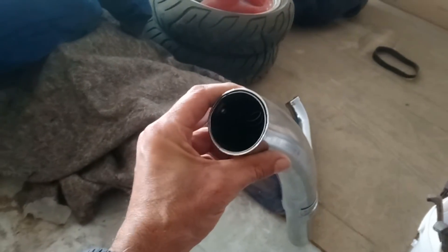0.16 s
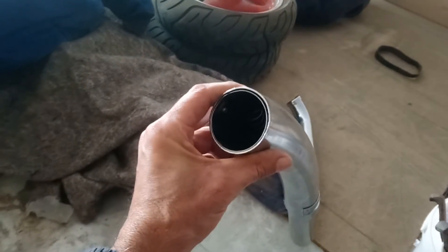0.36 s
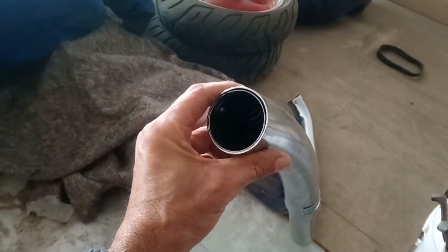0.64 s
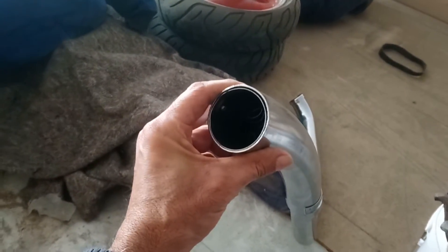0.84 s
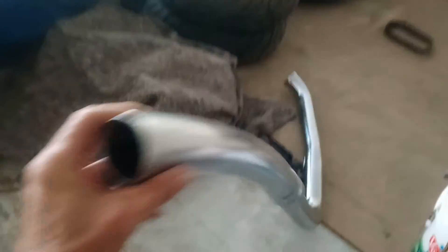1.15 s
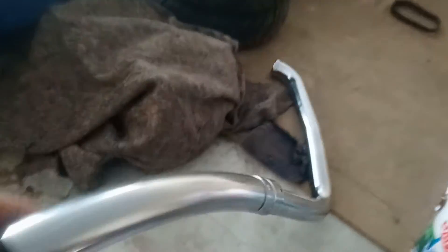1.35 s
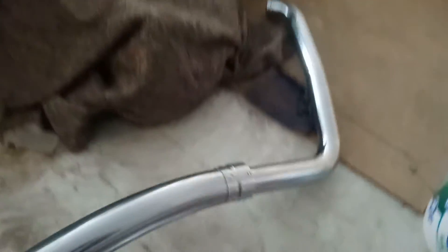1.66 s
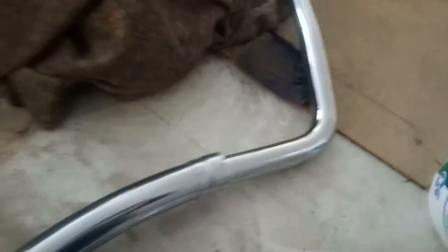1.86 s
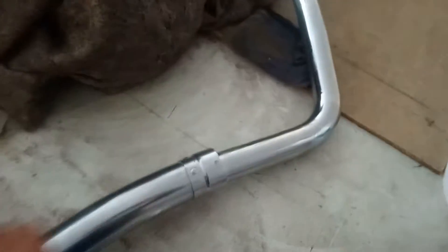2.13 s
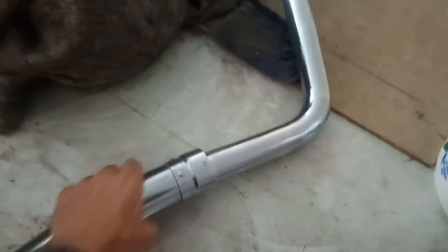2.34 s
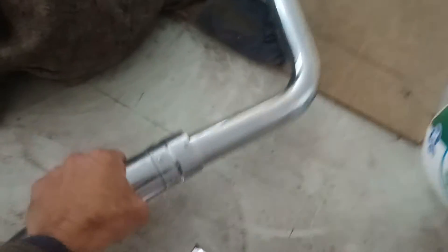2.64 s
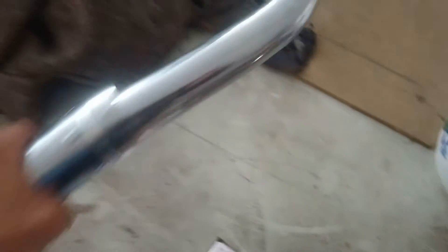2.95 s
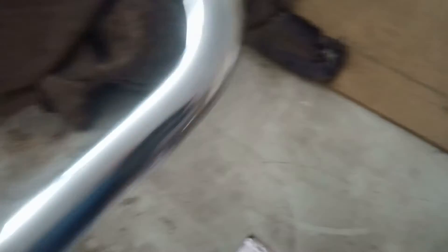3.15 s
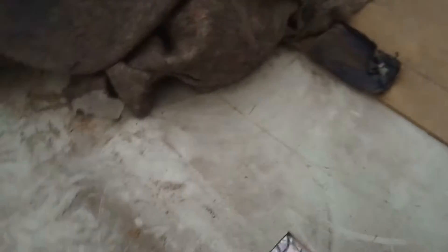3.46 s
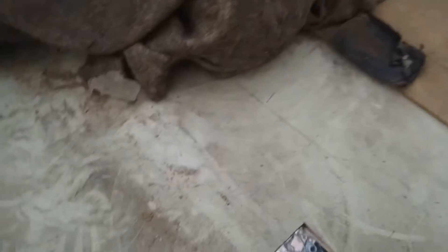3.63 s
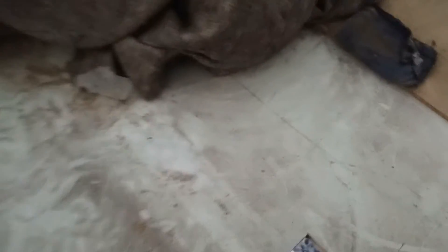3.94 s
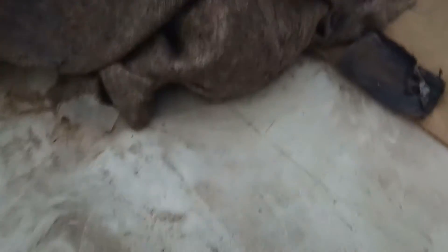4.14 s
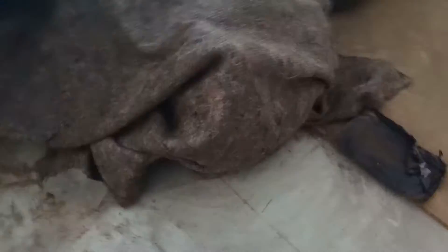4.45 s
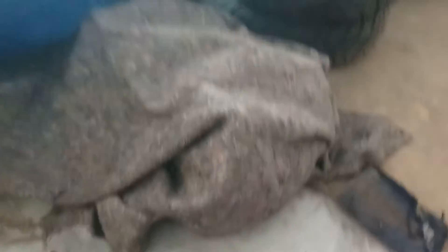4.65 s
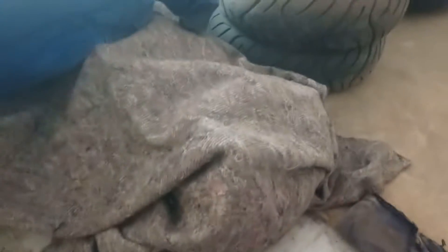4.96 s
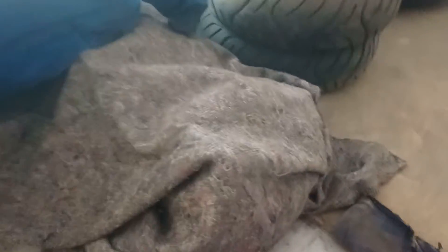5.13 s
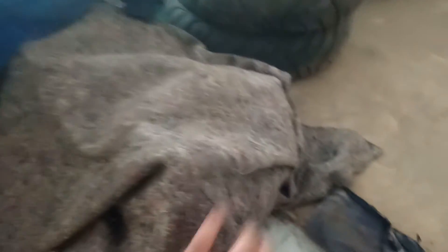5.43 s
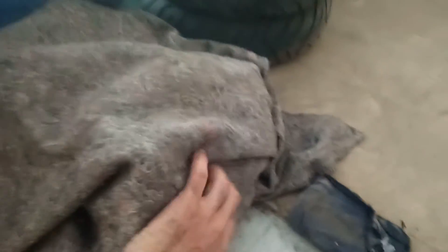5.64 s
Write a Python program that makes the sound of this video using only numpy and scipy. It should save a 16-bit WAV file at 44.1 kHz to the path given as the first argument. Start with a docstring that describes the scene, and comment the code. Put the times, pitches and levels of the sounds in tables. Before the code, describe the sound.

A steel pipe bumps and clanks onto a concrete floor, is picked up, then clatters away in a ringing metallic tumble beside faint cloth rustle.

```python
"""A steel exhaust pipe is lowered onto a workshop floor: it bumps twice, lands with a heavy clank and is picked up.
Then it is tossed aside and tumbles over the concrete, ringing at every bounce. Each blow is a swing of the floor,
bursts of coloured noise for heave, thud, clank and clash, and a set of fading sine waves for the ringing steel.
Clothes and a blanket rustle close by, and a dragged edge squeaks: noise and wavering tones that swell and fade.
The small room booms briefly in the tail of each blow, over steady quiet noise."""
import sys
import numpy as np
from scipy import signal
from scipy.fft import rfft, irfft, next_fast_len
from scipy.io import wavfile
from scipy.ndimage import uniform_filter1d, minimum_filter1d, map_coordinates

SR = 44100
rng = np.random.default_rng(int(sys.argv[2]) if len(sys.argv) > 2 else 0)


def master_out(mix):
    """Clip the mix to full scale and print it as 16-bit PCM to the path in sys.argv[1]."""
    frames = np.transpose(np.atleast_2d(mix))
    ceiling = np.clip(frames, -1, 1)
    pcm = np.round(ceiling * 32767).astype(np.int16)
    wavfile.write(sys.argv[1], SR, pcm)


N = 255339  # length in samples

# The pipe meets the floor. Each row: start in seconds, first swing of the floor in relative dB, its rough
# pitch in Hz, then floor heave, tube thud, tube clank and bare steel clash in relative dB, then the two modes
# that the contact point changes: lower in Hz, its change in dB, upper in Hz, its change in dB.
FLOOR_BLOWS = [(1.171, -9.5, 250, -31, -27.5, -60, -77, 460, 4, 1810, 22.5),
               (1.357, -16.5, 246, -33.5, -35, -72, -101, 244, -1, 460, -2),
               (1.826, -12, 150, -29, -19.5, -26.5, -36, 244, -5.5, 1520, 10.5),
               (1.832, 7, 180, -25, -13, -47, -53, 178, -3.5, 2078, 7),
               (1.861, -7.5, 258, -33.5, -20.5, -29.5, -39, 460, 2.5, 2143, 9.5),
               (3.883, -17, 260, -48, -26.5, -18.5, -16.5, 848, 13, 5899, 6.5),
               (3.914, -20, 228, -53, -30, -26, -24.5, 4100, 11, 6301, 15.5),
               (3.982, -8.5, 226, -38, -23.5, -23.5, -16.5, 3682, 12, 5972, 11),
               (4.156, 1.5, 335, -37, -20.5, -21, -30.5, 694, 10, 2235, -2),
               (4.168, -6.5, 257, -45, -22, -27.5, -36, 1325, 11, 2143, 5),
               (4.207, -15, 227, -25, -21, -22, -18.5, 2337, 18.5, 4290, 9.5),
               (4.262, -34, 224, -52, -34, -33, -34, 2357, 23, 4200, 14),
               (4.338, -1, 190, -19.5, -17, -22.5, -22, 1325, -1, 4345, -2),
               (4.374, -26, 224, -27.5, -34, -27.5, -27.5, 1325, 11, 4345, 15),
               (4.392, -23, 242, -30, -20.5, -29.5, -27.5, 2078, 20.5, 5726, 6),
               (4.567, -15, 242, -49, -26.5, -33.5, -37, 1520, 1, 4290, 1),
               (4.586, -16, 280, -49, -25.5, -33.5, -40, 2143, 18.5, 4290, 10),
               (4.608, -20, 226, -28.5, -20.5, -27, -21, 3951, 13.5, 4290, 15),
               (4.647, -1, 169, -24.5, -19, -36.5, -45.5, 178, 3, 2143, 20),
               (4.679, -13, 170, -28.5, -23.5, -36, -47.5, 178, 10, 2143, 20),
               (4.704, -28, 224, -41, -26.5, -24, -23.5, 1325, 13, 5726, 12),
               (4.735, -16, 224, -52, -34.5, -37, -38, 1810, 33, 2078, 0),
               (4.791, -30, 280, -62, -49, -32.5, -27.5, 1640, 9, 5726, 7.5),
               (4.799, -3.5, 287, -58, -31, -35, -40, 244, 7, 1640, 32),
               (4.823, -21, 275, -61, -31, -29, -26, 2283, 28, 4870, 19)]
# Ringing modes of the tube: its air column below 700 Hz, its steel wall above.
# Each row: pitch in Hz, relative strength in dB, time to fade by 60 dB in seconds if left alone.
PIPE_MODES = [(178, 5, .4), (244, 5, .4), (460, -2, .33), (694, -8, .25), (848, -2, .3), (1325, -2, .35),
              (1520, -10, 1.7), (1640, -6, .3), (1810, -5, .3), (2040, -6, .3), (2078, -7, 1.9),
              (2143, -8, 1.5), (2235, -7, .4), (2283, -6, .25), (2321, -3, .6), (2357, -6, .4),
              (2470, -4, .3), (2540, -3, .3), (2655, -4, .35), (2820, -6, .3), (3295, -4, .3),
              (3682, -2, .22), (3828, -7, .3), (3951, -5, .25), (4100, -2, .3), (4250, -7, .25),
              (4290, -4, .3), (4312, -6, .22), (4345, -6, .25), (4522, -7, .25), (4786, -2, .25),
              (4870, -7, .25), (5280, -7, .25), (5726, -4, .3), (5899, -3, .28), (5972, -2, .27),
              (6020, -5, .22), (6301, -5, .28), (6600, -7, .25), (6700, -7, .25), (6870, -9, .25),
              (7135, -12, .3), (7550, -15, .3)]


def amp(db):
    """Turn decibels into a plain gain."""
    return 10 ** (np.asarray(db) / 20)


def unit(x):
    """Scale x to an rms (average strength) of 1."""
    return x / np.sqrt(np.mean(x ** 2) + 1e-20)


def along(points, hz):
    """Read a curve of (Hz, value) points, with frequency on a log axis."""
    f, v = np.transpose(points)
    return np.interp(np.log(hz + 1), np.log(f + 1), v)


def wobble(rate):
    """A smooth random curve through new random values, rate of them a second."""
    values = rng.standard_normal(int(N * rate / SR) + 4)
    return map_coordinates(values, [np.arange(N) * rate / SR])


def filtered(x, response):
    """Change the strength and phase of each frequency in x by a given response."""
    size = next_fast_len(x.shape[-1] + 8192)  # spare room keeps the end from wrapping to the start
    spectrum = rfft(x, size) * response(np.fft.rfftfreq(size, 1 / SR))
    return irfft(spectrum, size)[..., :x.shape[-1]]


def noise(spectrum, size, jagged=0, alike=None):
    """Coloured stereo noise of rms 1, more alike left and right in the bass; jagged adds chance resonances."""
    # Each row: frequency in Hz, likeness of left and right (1 is the same, 0 unrelated).
    usual_likeness = [(100, 0.78), (250, 0.74), (500, 0.69), (1000, 0.018), (2000, -0.042), (4000, 0.011),
                      (12000, -0.064)]
    hz = np.fft.rfftfreq(size, 1 / SR)
    likeness = along(usual_likeness if alike is None else alike, hz)
    turn = np.arccos(np.clip(likeness, -1, 1)) / 2  # shares the noise between middle and sides
    knots = np.arange(0, SR / 2, 45)  # one chance peak or dip every 45 Hz
    peaks_db = jagged * np.interp(hz, knots, rng.uniform(-2.7, 2.37, len(knots)))
    white = rfft(rng.standard_normal((2, size)))
    coloured = white * amp(along(spectrum, hz) + peaks_db)
    mid, side = irfft(coloured * [np.cos(turn), np.sin(turn)], size)
    return unit(np.array([mid + side, mid - side]))


def add(track, s, sound):
    """Mix a sound into the track from s seconds on."""
    part = track[:, round(s * SR):][:, :sound.shape[1]]
    part += sound[:, :part.shape[1]]


def gesture(start, end, rise, fall):
    """An envelope that swells up to start, holds until end and dies away."""
    t = np.arange(N) / SR
    before, after = np.maximum(start - t, 0), np.maximum(t - end, 0)
    return np.exp(-before / rise - after / fall)


def workshop_quiet():
    """The steady background: soft coloured noise whose level drifts slightly."""
    # Each row: frequency in Hz, relative strength in dB per Hz.
    quiet_colour = [(25, -22), (55, -8.5), (98, -1), (140, -7.5), (280, -8.5), (500, -14.5), (1000, -17),
                    (2000, -20), (3000, -22.5), (4800, -23), (6000, -6), (6900, -18), (8200, -35),
                    (13000, -40), (15300, -21), (16400, -49.5)]
    return amp(-64.5 + 0.16 * wobble(7.2)) * noise(quiet_colour, size=N)


def handling():
    """Hands and sleeves rub unevenly with every arm movement: two rustling noises over a low rumble."""
    # Arm movements: lower the pipe, reach, lift, toss, reach for the blanket.
    # Each row: start in seconds, end in seconds, rustle in relative dB, rumble in relative dB.
    moves = [(0.987, 1.823, -69.5, -60.5), (2.054, 2.496, -61, -62.5), (2.62, 3.204, -62, -76),
             (3.728, 3.9, -63.5, -62), (5.143, 5.505, -54.5, -78)]
    # Colours of the three noises. Each row: frequency in Hz, relative strength in dB per Hz.
    rumble_colour = [(20, -20.5), (55, -3), (100, 4.5), (150, -4.5), (280, -2.5), (500, -6), (1200, -38)]
    rub_colour = [(200, -2), (450, 0.5), (1200, 0.5), (2000, 1.5), (2800, -10.5), (5000, -49)]
    hiss_colour = [(1500, -24.5), (3000, -4), (4500, 0.5), (6300, 2), (7200, -6), (8300, -24),
                   (12000, -30.5), (16000, -17)]
    rise_s, fall_s = 0.12, 0.15  # time constants before a movement's start and after its end
    levels = [amp([[rustle_db], [rumble_db]]) * gesture(start, end, rise_s, fall_s)
              for start, end, rustle_db, rumble_db in moves]
    rustle, shake = np.max(levels, axis=0)
    grain_db = 1.1 * wobble(35) + 1.5 * wobble(220)  # slow and quick unevenness of rubbing
    rumble = shake * amp(3 * wobble(10)) * noise(rumble_colour, size=N)
    rub = amp(2.5 + grain_db) * noise(rub_colour, size=N)
    hiss = amp(2 + 1.3 * grain_db) * noise(hiss_colour, size=N)
    return rumble + rustle * (rub + hiss)


def brushes():
    """Short noise swishes: the hand turns the pipe, the pipe skids between bounces, cloth snags under a hand."""
    # Quick strokes. Each row: peak time in seconds, level in dB, time constant of the fall in seconds.
    strokes = [(0.925, -45, 0.057), (0.974, -55.5, 0.069), (3.038, -64, 0.0031), (4.59, -35.5, 0.18),
               (4.845, -20, 0.016), (4.946, -44, 0.055), (5.178, -40, 0.05), (5.635, -45.5, 0.011),
               (5.658, -35.5, 0.024)]
    # Each row: frequency in Hz, relative strength in dB per Hz.
    cloth_colour = [(120, -9.5), (200, -22), (777, -22), (968, -13.5), (1480, -10), (2090, -5.5),
                    (3970, -11.5), (5840, -4), (7830, -26), (15100, -66), (16000, -41)]
    rise_share = 0.33  # a stroke's rise time over its fall time
    stroke = sum(amp(db) * gesture(s, s, rise_share * fall, fall) for s, db, fall in strokes)
    return stroke * amp(0.61 * wobble(400)) * noise(cloth_colour, size=N)


def scrapes():
    """A dragged edge sings in short, grainy bands that slide with the contact point: wavering sine waves."""
    # Faint squeaks as the pipe is turned and dragged. Each row: start in seconds, end in seconds, start pitch
    # in Hz, end pitch in Hz, random changes a second (more make a wider band), relative level in dB.
    squeaks = [(0, 0.125, 5670, 5400, 2400, -59), (0.137, 0.524, 3520, 3850, 268, -68),
               (0.427, 0.623, 980, 950, 90, -74), (0.144, 0.406, 1855, 1940, 129, -71),
               (0.758, 0.955, 342.5, 346, 69.5, -59), (1.43, 1.8, 1626, 1595, 401, -60),
               (1.514, 1.75, 963, 963, 238, -59), (1.714, 1.88, 1580, 1580, 110.5, -68),
               (2.602, 2.679, 1446, 1535, 130.7, -56), (2.651, 2.74, 1800, 1620, 394, -60),
               (2.714, 2.918, 1360, 1088, 398.5, -55), (2.796, 2.985, 357.5, 260, 130.4, -57),
               (3.036, 3.194, 1094, 1100, 1410, -71), (4.984, 5.224, 995, 1367, 300, -56)]
    grain_db, grain_rate = 1.3, 67  # the edge catches and slips: typical swing in dB, random values a second
    t = np.arange(N) / SR
    out = np.zeros((2, N))
    for start, end, from_hz, to_hz, width, db in squeaks:
        swell = np.sin(np.pi * np.clip((t - start) / (end - start), 0, 1))
        pitch_hz = np.interp(t, [start, end], [from_hz, to_hz])
        phase = 2 * np.pi * np.cumsum(pitch_hz) / SR
        bands = [wobble(width) * np.sin(phase) + wobble(width) * np.cos(phase) for port in range(2)]
        out += amp(db) * swell * np.array(bands)
    return out * amp(grain_db * wobble(grain_rate))


def burst(spectrum, t60, rise, punch, punch_time, tail_db, jagged):
    """Noise for crowded modes struck at once: a strong first shake, a fast decay and the room's tail."""
    # Likeness of the pipe's sound left and right. Each row: frequency in Hz, likeness (1 same, 0 unrelated).
    pipe_likeness = [(100, 1), (300, 1), (600, 0.67), (1300, 0.51), (2000, 0.75), (3000, -0.37),
                     (6000, 0.0061), (12000, 0)]
    t = np.arange(SR) / SR
    first_shake = 1 + punch * np.exp(-t / punch_time)
    room_tail = amp(tail_db - 60 * t / 0.79)  # falls by 60 dB in 0.79 s
    fade = first_shake * amp(-60 * t / t60) + room_tail
    x = noise(spectrum, size=SR, jagged=jagged, alike=pipe_likeness) * fade * (1 - np.exp(-t / rise))
    return x / np.sqrt(np.mean(x[:, t < .04] ** 2))  # rms 1 over the first 40 ms


def push(hz, t60):
    """The floor's first swing under the blow: a fast-fading sine, the same in both channels."""
    t = np.arange(SR // 10) / SR
    pitch_hz = hz * np.exp(rng.normal(0, 0.024))  # a little different each time
    onset = 1 - np.exp(-(t / 0.0027) ** 2)
    swing = -np.sin(2 * np.pi * pitch_hz * t) * amp(-60 * t / t60) * onset
    return np.array([swing, swing])


def chatter():
    """The fast, uneven gain of bare steel rattling on concrete, one second long."""
    depth_db, rate, turn_s = 2.1, 260, 0.008  # scale of the flicker, random values a second, time constant
    t = np.arange(SR) / SR
    flicker = map_coordinates(rng.standard_normal(int(rate) + 4), [t * rate])
    # the depth starts at minus half, passes zero after about 5.5 ms and settles at plus half
    return amp(depth_db * flicker * (0.5 - np.exp(-t / turn_s)))


def contact(push_db, push_hz, heave_db, thud_db, clank_db, clash_db):
    """One knock: the floor swings and heaves, the tube thuds and clanks, its thin wall clashes."""
    # Colours from the floor's heave to the thin wall's clash.
    # Each row: frequency in Hz, relative strength in dB per Hz.
    heave_colour = [(20, -11.5), (50, -20), (78, -20.5), (99, -6), (135, -9), (220, -23), (600, -96)]
    thud_colour = [(50, -52), (110, -14.5), (170, 3.5), (260, 4), (380, -3.5), (520, -8.5), (700, -16.5),
                   (1500, -26.5), (4000, -93)]
    clank_colour = [(150, -15.5), (450, -3), (850, -1.5), (1250, -7), (1800, -4.5), (2350, -10),
                    (2800, -16.5), (4000, -20), (8000, -72.5)]
    clash_colour = [(1200, -29), (2600, 2.5), (3200, -2), (4200, 5), (5100, -2.5), (6400, 2), (7200, -7),
                    (8300, -21.5), (10500, -29.5), (13500, -34), (15200, -19.5), (16500, -45.5)]
    # Clash over thud in dB, for a dull and then a bare steel contact.
    hardness_span = [-17.5, 2]
    # Scale of the chance resonances for a dull and then a bare steel contact: harder brings out more.
    clank_jagged_span = [3, 6]
    clash_jagged_span = [3, 8]
    hardness_db = clash_db - thud_db
    clank_jagged = np.interp(hardness_db, hardness_span, clank_jagged_span)
    clash_jagged = np.interp(hardness_db, hardness_span, clash_jagged_span)
    heave = burst(heave_colour, t60=0.25, rise=0.0033, punch=0.97, punch_time=0.0065, tail_db=-4, jagged=-3)
    thud = burst(thud_colour, t60=0.4, rise=0.001, punch=0.91, punch_time=0.0038, tail_db=-27, jagged=-0.5)
    clank = burst(clank_colour, t60=0.17, rise=0.0002, punch=1.5, punch_time=0.0016, tail_db=-6,
                  jagged=clank_jagged)
    clash = chatter() * burst(clash_colour, t60=0.29, rise=0.00024, punch=0.68, punch_time=0.01, tail_db=-21,
                              jagged=clash_jagged)
    sound = amp(heave_db - 3) * heave + amp(thud_db - 3.5) * thud
    sound += amp(clank_db) * clank + amp(clash_db - 3) * clash
    add(sound, 0, amp(push_db) * push(hz=push_hz, t60=0.028))
    return sound


def ring(favoured, scatter_db):
    """Strength and phase of each mode in the two channels; the contact point changes two modes."""
    hz, db, _ = np.transpose(PIPE_MODES)
    boost_db = np.zeros(len(hz))
    for mode_hz, extra_db in favoured:
        boost_db[np.argmin(np.abs(hz - mode_hz))] += extra_db
    strength = amp(db + boost_db + scatter_db * rng.standard_normal((2, len(hz))))
    shared_phase = 2 * np.pi * rng.random(len(hz))
    own_phase = np.minimum(hz / 1500, 1) * rng.normal(0, 1.0, (2, len(hz)))  # channels differ more high up
    return strength * np.exp(1j * (shared_phase + own_phase))


def damping(s, t):
    """Gain of a ring struck at s, t seconds on: later contacts lift it a little, a grip or lying flat stops it."""
    # The ring is stopped: a hand grips the pipe, later it falls flat. Times in seconds.
    stops = [2.45, 4.86]
    contact_lift_db, stop_db_per_s = 1, 152  # lift at each later blow, and how much faster a stopped ring dies
    contacts = np.searchsorted([row[0] - s for row in FLOOR_BLOWS if row[0] > s], t)
    stop = min(when for when in list(stops) + [N / SR] if when > s)
    return amp(contact_lift_db * contacts - stop_db_per_s * np.maximum(s + t - stop, 0))


def aside(x):
    """The pipe lies to the right, so its sound reaches the left channel later."""
    lag_s = 0.00038
    side = np.array([[-1], [1]])  # left later, right earlier, each by half the lag
    # beyond one cycle of lag the paths are too mixed to keep the delay
    return filtered(x, lambda hz: np.exp(1j * np.pi * np.minimum(hz * lag_s, 1) * side))


def pipe():
    """Each blow shakes the floor, clanks through the tube and sets the steel ringing; light touches only knock."""
    # Ring of air column, low wall modes and high wall modes, in dB against thud, clank and clash.
    ring_levels = [-18, -15.5, -13]
    # Light knocks as the pipe tips, settles, is gripped and is lifted.
    # Each row: start in seconds, then thud, clank and clash in relative dB.
    touches = [(1.085, -61.5, -62.5, -70), (1.927, -30, -42.5, -49), (1.977, -37, -53, -69),
               (2.063, -61, -59, -52.5), (2.102, -62, -74, -66), (2.401, -49, -54.5, -84),
               (2.495, -50.5, -59, -60), (3.035, -76, -48.5, -66), (3.439, -63.5, -68.5, -82)]
    touch_push_db, touch_push_hz, touch_heave_db = 11, 190, 4  # floor under a light knock, dB over its thud
    high_ring_grows = 0.37  # a sharper contact wakes the high modes more: dB per dB of clash over thud
    flutter_db, flutter_rate = 1, 70  # the ring flutters as the pipe turns: typical dB, random values a second
    attack_s = 0.0005  # the modes swell over the time of the contact
    knocks, ringing = np.zeros((2, 2, N))
    t = np.arange(3 * SR // 2) / SR
    hz, _, t60 = np.transpose(PIPE_MODES)
    # each mode is a spinning complex wave, so that strength and phase can be set in one product
    modes = np.exp(2j * np.pi * hz[:, None] * t) * amp(-60 * t / t60[:, None]) * (1 - np.exp(-t / attack_s))
    for row in FLOOR_BLOWS:
        s, push_db, push_hz, heave_db, thud_db, clank_db, clash_db = row[:7]
        lower_hz, lower_db, upper_hz, upper_db = row[7:]
        add(knocks, s, contact(push_db, push_hz, heave_db, thud_db, clank_db, clash_db))
        # a soft contact reaches only the low modes, a hard one the high ones too
        high_force_db = clash_db + high_ring_grows * (clash_db - thud_db)
        air_db, low_db, high_db = np.add(ring_levels, [thud_db, clank_db, high_force_db])
        force_db = np.interp(hz, [500, 830, 2400, 3530], [air_db, low_db, low_db, high_db])
        struck = amp(force_db) * ring([(lower_hz, lower_db), (upper_hz, upper_db)], scatter_db=1)
        add(ringing, s, (struck @ modes).imag * damping(s, t))
    for s, thud_db, clank_db, clash_db in touches:
        push_db, heave_db = thud_db + touch_push_db, thud_db + touch_heave_db
        add(knocks, s, contact(push_db, touch_push_hz, heave_db, thud_db, clank_db, clash_db))
    return aside(knocks + amp(flutter_db * wobble(flutter_rate)) * ringing)


def scene():
    """The pipe and the rustling over the quiet of the workshop."""
    return workshop_quiet() + handling() + brushes() + scrapes() + pipe()


def record(dry):
    """The microphone sheds deep bass, a limiter holds peaks, left and right differ in colour, the top is cut."""
    # Each row: frequency in Hz, left minus right level in dB.
    left_lean = [(200, 0.7), (600, -0.5), (1200, 3), (2000, 3), (4000, 0), (6500, -2.5), (8500, -4.5),
                 (14000, -7.5)]
    top_hz = 16400
    thinned = signal.sosfilt(signal.butter(2, 65, "highpass", fs=SR, output="sos"), dry)
    needed = np.minimum(1, 0.65 / (np.abs(thinned).max(axis=0) + 1e-9))  # gain that keeps peaks at 0.65
    limited = thinned * uniform_filter1d(minimum_filter1d(needed, size=180), size=180)
    half = np.array([[.5], [-.5]])  # half the difference to each side
    return filtered(limited, lambda hz: amp(along(left_lean, hz) * half) * (hz < top_hz))


dry = scene()
out = record(dry)
master_out(out)
```